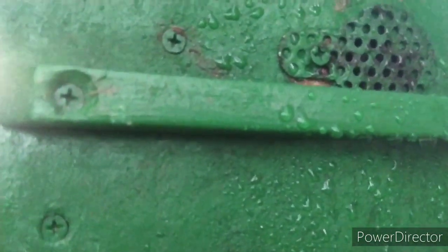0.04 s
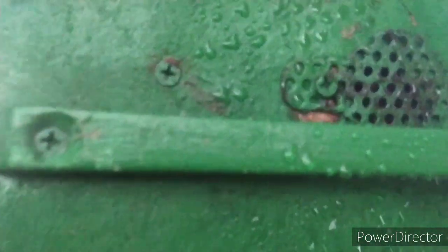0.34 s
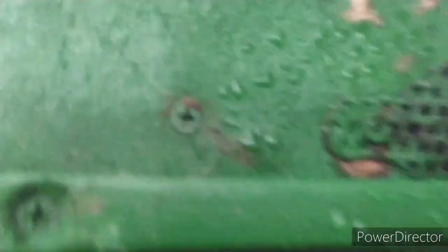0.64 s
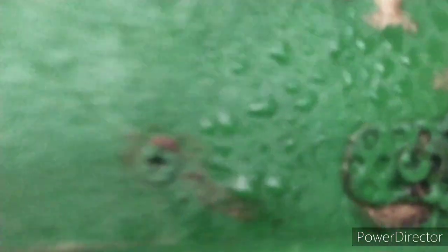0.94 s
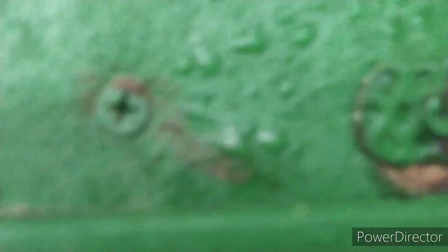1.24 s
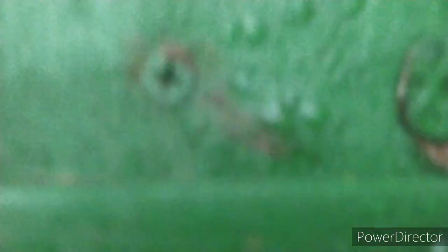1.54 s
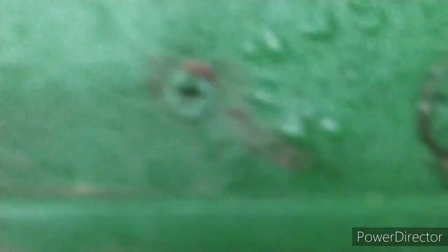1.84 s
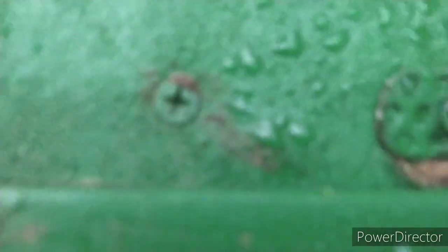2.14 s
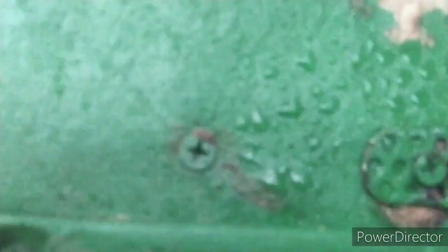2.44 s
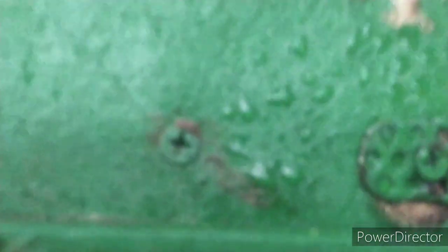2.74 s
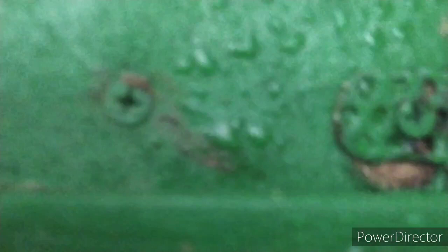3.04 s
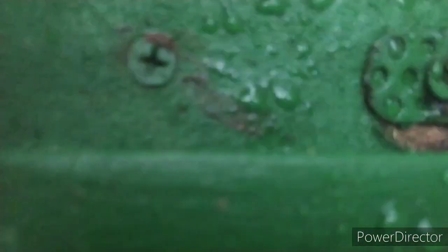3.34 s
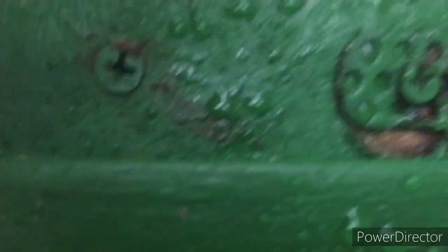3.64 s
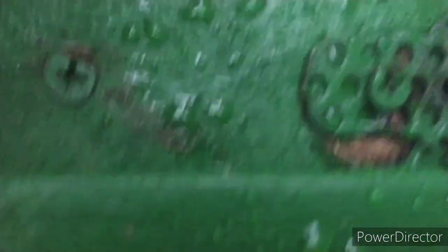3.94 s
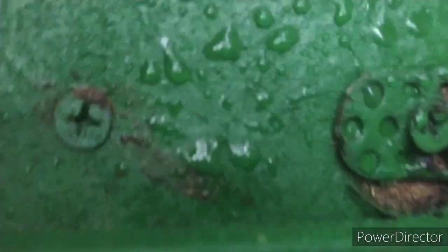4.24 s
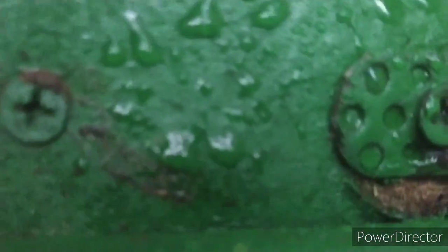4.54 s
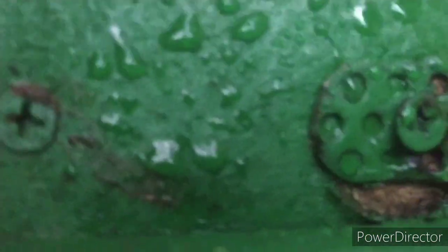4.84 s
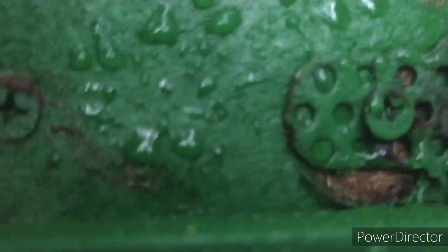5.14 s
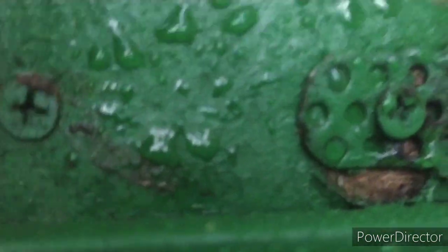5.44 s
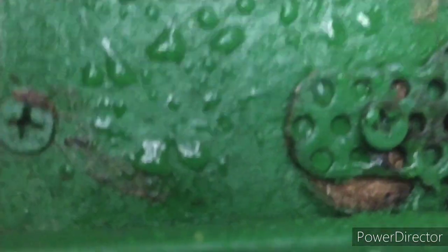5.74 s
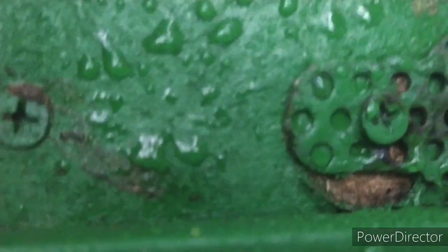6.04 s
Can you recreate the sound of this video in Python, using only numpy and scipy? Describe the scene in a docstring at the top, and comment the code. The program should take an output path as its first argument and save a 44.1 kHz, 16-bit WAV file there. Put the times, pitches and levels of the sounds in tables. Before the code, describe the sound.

In a quiet outdoor spot, a handheld microphone picks up close finger clicks, rubbing and a lumpy low rumble. As the clicks thin out, a bird sings a faint run of whistled notes and quick chirps. Two loud, short, hollow thumps on a wooden box just in front follow, about a second and a half apart, each with a harsh crackle.

```python
"""Fingers shift on a small camera held close to a painted wooden box outdoors. First they tap and brush
its two microphone ports, pushing air in and hissing, and a bird whistles far off. Something metal rings
faintly around 2 s, as a nearby songbird starts one phrase of gliding notes. Near the end of the song,
at 4 s, a bump rings the hollow box with a thump; a second follows at 5.5 s. Throughout, the hand makes
the camera's shell rumble over quiet outdoor air."""
import sys
import numpy as np
from scipy import signal
from scipy.fft import rfft, irfft, next_fast_len
from scipy.io import wavfile
from scipy.ndimage import uniform_filter1d, map_coordinates

SR = 44100
rng = np.random.default_rng(int(sys.argv[2]) if len(sys.argv) > 2 else 0)


def unload_audio(sound):
    """Save the sound as a 16-bit wav file, at the path given as the first command line argument."""
    columns = np.transpose(np.atleast_2d(sound))
    # keep every value between -1 and 1, then stretch to whole-number steps
    steps = np.round(np.clip(columns, -1, 1) * 32767)
    wavfile.write(sys.argv[1], SR, steps.astype(np.int16))


N = 273420


def amp(db):
    """Decibels to gain."""
    return 10 ** (np.asarray(db) / 20)


def unit(x):
    """Scale to rms 1."""
    return x / np.sqrt(np.mean(x ** 2) + 1e-20)


def along(points, hz):
    """Read (Hz, value) points on a log axis."""
    freqs, values = np.transpose(points)
    return np.interp(np.log(hz + 1), np.log(freqs), values)


def clock(length):
    """Sample times over a length in seconds."""
    return np.arange(int(length * SR)) / SR


def filtered(x, response):
    """Pass x through a frequency response."""
    n = x.shape[-1]
    padded = next_fast_len(n + 8192)
    return irfft(rfft(x, padded) * response(np.fft.rfftfreq(padded, 1 / SR)), padded)[..., :n]


def noise(size, colour):
    """Noise of rms 1, coloured by an EQ curve in dB."""
    return unit(filtered(rng.standard_normal(size), lambda hz: amp(colour(hz))))


def wide_noise(size, colour):
    """Independent coloured noise left and right."""
    return np.array([noise(size, colour), noise(size, colour)])


def high_cut(hz, edge_hz, steepness):
    """A treble roll-off in dB."""
    return -10 * np.log10(1 + (hz / edge_hz) ** steepness)


def band(hz, centre_hz, half_width_hz):
    """A band-pass curve in dB."""
    return -20 * np.log10(1 + ((hz - centre_hz) / half_width_hz) ** 2)


def wobble(t, rate):
    """A smooth random curve with rate knots a second."""
    return map_coordinates(rng.standard_normal(int(t[-1] * rate) + 4), [t * rate])


def pan(left_db):
    """Port gains for a left-minus-right level; the nearer port stays at full level."""
    return amp([[min(left_db, 0)], [min(-left_db, 0)]])


def add(out, start, x):
    """Mix x into out from a start time in seconds."""
    part = out[..., max(round(start * SR), 0):][..., :x.shape[-1]]
    part += x[..., :part.shape[-1]]


def leak(hz, corner_hz):
    """Slow pressure escapes round the diaphragm: a second-order high-pass."""
    return -hz ** 2 / (corner_hz ** 2 - hz ** 2 + 1j * hz * corner_hz)


# resonances of a covered port: (frequency [Hz], width [Hz], gain [dB])
PORT_MODES = [(396, 480, 1), (1140, 60, -5), (1780, 270, 2), (3250, 190, 2)]
def cavity(hz):
    """The hollow between fingertip and diaphragm rings briefly at its resonances."""
    return 1 + sum(amp(db) * 1j * hz * width / (centre ** 2 - hz ** 2 + 1j * hz * width)
                   for centre, width, db in PORT_MODES)


# dark tone of skin pressed on a port: (frequency [Hz], level [dB])
PRESSED_SKIN_EQ = [(40, -24), (150, -4.5), (450, 2.5), (1000, -8), (2500, -13), (7000, -23.5), (16000, -31)]
# fingertip hits: (time [s], level [dB], contact time [ms], thud against push [dB], port [left/right])
TAPS = [(0.2113, -4, 0.21, -25, "left"), (0.236, -23.5, 0.64, -14, "left"),
        (0.719, -27.5, 0.18, 16, "left"), (.745, -0.5, 0.24, -10, "left"), (0.7593, -9, 0.21, 7, "left"),
        (0.8835, -6.5, 0.31, -40, "left"), (0.9485, -25.5, 0.78, -11, "left"),
        (1.0232, -6.5, 1.03, -33, "left"), (1.038, -11, 1, -28, "left"), (1.111, -25.5, 0.22, 18.5, "left"),
        (1.4321, -5.5, 0.12, 4, "left"), (1.728, -18, 3.5, 6, "left"), (1.7397, -18.5, 0.12, 4, "left"),
        (2.398, -10.5, 0.24, -8, "right"), (3.553, -4, 8.6, -17, "left"), (5.079, -17, 30, 13.5, "left"),
        (5.3448, -9.5, 3.1, -10, "left")]
def taps(thud_hz=112, thud_t60=0.016, leak_hz=100, skin_db=-27, dulling_hz=450):
    """A fingertip pushes air into a port; the skin crackles and the shell gives a low thud."""
    out, t = np.zeros((2, N)), clock(.12)
    for start, db, contact_ms, thud_db, port in TAPS:
        side = 1 if port == "left" else -1
        contact = t / (contact_ms / 1000) * np.pi
        attack = 1 - np.exp(-contact)
        push = contact ** 3 * np.exp(-contact)
        thud = np.sin(2 * np.pi * thud_hz * t) * attack * amp(thud_db - 60 * t / thud_t60)
        # a slow contact is dull
        skin = noise(len(t), lambda hz: along(PRESSED_SKIN_EQ, hz) - hz * contact_ms / dulling_hz)
        skin *= attack ** 2 * amp(skin_db - 60 * t / .015)
        # the push stays at its own port; the thud crosses the shell more easily
        tap = pan(side * 40) * (push / push.max() + skin) + pan(side * 34) * thud
        add(out, start, amp(db) * filtered(tap, lambda hz: leak(hz, leak_hz) * cavity(hz)))
    return out


# airy tone of grazing skin: (frequency [Hz], level [dB])
AIRY_EQ = [(100, 16.5), (400, -4), (800, -7), (4000, -4.5), (14000, -4)]
# the tone opens as the finger creeps up to the port: (time [s], high cut [Hz], air pocket boost [dB])
RUB_TONE = [(.3, 6450, 4.5), (.76, 9400, 2), (1.8, 19100, 0.5)]
# brush strokes: (time [s], attack [s], release [s], level [dB], pressure [0-1], pan left [dB])
RUBS = [(.126, 0.0022, 0.062, -26.5, 0.13, 34), (0.27, .008, 0.0097, -39, 1, 29),
        (.302, 0.022, 0.063, -42, 0.34, 19), (0.401, 0.12, 0.4, -52.5, 0.8, 24),
        (0.7574, 0.00079, 0.013, -17, 0.68, 37), (.77, 0.05, 0.037, -26, 0.58, 43),
        (0.903, 0.012, 0.033, -35.5, 0.5, 30), (1.017, 0.0057, 0.063, -23.5, 0.65, 39),
        (1.4311, 0.0012, 0.0031, -20, 0.25, 33), (1.431, 0.0026, 0.034, -35, 0.35, 18),
        (1.514, 0.03, 0.084, -42.5, 0.15, 7), (1.595, 0.013, 0.031, -38, 0.58, -21),
        (1.673, 0.015, 0.037, -29.5, 0.5, -15), (1.722, 0.0091, 0.058, -34.5, 0.07, 23),
        (1.845, 0.035, 0.11, -38.5, 0, 10), (1.948, 0.02, 0.042, -35.5, 0.11, 9),
        (2.395, 0.0029, 0.051, -24.5, 0.65, -28), (2.43, 0.052, 0.081, -46, 0.01, 4.5),
        (3.933, 0.011, 0.0051, -43.5, 0.24, 5)]
def rubs(catch_db=1.5, pocket_hz=3500, pocket_width_hz=2400, ridge_db=-0.5, pressed_ridge_db=2):
    """Skin hisses over a port in short strokes, fuller and darker the harder it presses."""
    out = np.zeros((2, N))
    times, edges, boosts = np.transpose(RUB_TONE)
    for start, rise, fall, db, pressure, pan_db in RUBS:
        t = clock(rise + fall)
        edge_hz = np.interp(start + rise, times, edges)
        boost_db = np.interp(start + rise, times, boosts)

        def colour(hz):
            """Skin tone plus the resonance of air trapped under the finger."""
            skin = (1 - pressure) * along(AIRY_EQ, hz) + pressure * along(PRESSED_SKIN_EQ, hz)
            pocket = boost_db / (1 + (2 * (hz - pocket_hz) / pocket_width_hz) ** 2)
            return skin + pocket + high_cut(hz, edge_hz, 5)

        swell = np.sin(np.pi / 2 * np.interp(t, [0, rise, rise + fall], [0, 1, 0]))
        # the ridges of the skin catch and slip, more roughly under pressure
        ridges = unit(amp((ridge_db + pressed_ridge_db * pressure) * wobble(t, 898)))
        stroke = amp(db + catch_db * wobble(t, 211)) * swell * ridges
        add(out, start, pan(pan_db) * stroke * wide_noise(len(t), colour))
    return out


# rumble of the gripped shell: (frequency [Hz], level [dB])
SHELL_EQ = [(20, -27), (40, -3.5), (65, 6), (110, -3.5), (180, -12.5), (300, -44), (2000, -64)]
# how hard the hand works on the shell: (time [s], level before trim [dB])
GRIP_FADER = [(0.74, -48), (0.93, -41.5), (1.24, -59.5), (1.83, -45.5), (2.68, -40.5), (3.11, -44),
              (3.49, -43.5), (3.8, -52), (3.94, -52), (4.14, -32.5), (4.52, -53.5), (4.8, -54.5),
              (4.97, -40.5), (6.2, -42.5)]
# the hand slips to a new hold: (time [s], length [s], level [dB])
SLIPS = [(0.132, 0.0071, -30.5), (0.223, 0.081, -32), (0.762, 0.014, -19.5), (1.893, 0.026, -25),
         (2.197, 0.031, -27.5), (2.711, 0.076, -25.5), (2.943, 0.038, -28.5), (3.389, 0.21, -32),
         (4.27, 0.15, -25), (4.75, 0.24, -34.5), (5.059, 0.063, -24.5), (5.352, 0.021, -20),
         (5.682, 0.075, -25.5), (5.96, 0.26, -30)]
def grip(trim_db=6, lump_db=4.6, lumps_per_s=22, creak_db=-19, creak_hz=180,
         attack_s=0.015, release_s=0.021):
    """The hand, on the left, rumbles the shell in uneven lumps; each slip swells, holds and dies away."""
    t, channels = np.arange(N) / SR, []
    power = (pan(15) * amp(np.interp(t, *np.transpose(GRIP_FADER)) + trim_db)) ** 2
    for start, length, db in SLIPS:
        swell = np.interp(t - start, [-attack_s, 0, length, length + release_s], [0, 1, 1, 0])
        power += (pan(24) * amp(db) * swell ** 2) ** 2
    for envelope in np.sqrt(power):
        rumble = noise(N, lambda hz: along(SHELL_EQ, hz))
        rumble /= np.sqrt(np.abs(uniform_filter1d(rumble ** 2, size=3000)) + 0.033)  # even out the level
        # the skin catches now and then with a dull creak above the rumble
        creak = noise(N, lambda hz: band(hz, creak_hz, creak_hz / 2)) * unit(amp(5 * wobble(t, 49)))
        lumps = unit(amp(lump_db * wobble(t, lumps_per_s)))
        channels.append(envelope * (rumble * lumps + amp(creak_db) * creak))
    return np.array(channels)


# hollow body of the box: (frequency [Hz], level [dB], t60 [s])
BOX_MODES = [(154.2, -2, 0.091), (195.8, -23.5, 0.23), (262, -30.5, 0.15), (333, -14.5, 0.08),
             (404.5, -11.5, 0.056), (498, -36.5, 0.12), (731, -22.5, 0.055), (786, -29, 0.061)]
# harsh crackle of the overloaded recorder: (frequency [Hz], level [dB])
OVERLOAD_EQ = [(300, 19.5), (800, 5), (2000, -6), (4000, -14), (7000, -24), (14000, -18)]
# hits on the box: (time [s], level [dB], crackle within the hit [dB], board within the hit [dB])
BUMPS = [(3.9593, 6.3, -18.5, -47), (5.4873, 6.297, -16.5, -22.5)]
def box_bumps(leak_hz=95, panels_db=-21, panels_t60=0.07, panels_hz=500,
              board_hz=1240, board_t60=0.028, crackle_t60=0.049):
    """Each bump rings the box and struck board, with a short, harsh crackle of recorder overload."""
    out, t = np.zeros((2, N)), clock(0.13)
    attack = 1 - np.exp(-t / .0013)
    for start, db, crackle_db, board_db in BUMPS:
        body = -sum(amp(mode_db + rng.normal(0, 1) - 60 * t / t60) * np.cos(2 * np.pi * hz * t)
                    for hz, mode_db, t60 in BOX_MODES)
        board = np.sin(2 * np.pi * board_hz * t) * amp(board_db - 60 * t / board_t60)
        panels = noise(len(t), lambda hz: high_cut(hz, panels_hz, 8))  # many close, damped modes
        panels *= amp(panels_db - 60 * t / panels_t60)
        crackle = wide_noise(len(t), lambda hz: along(OVERLOAD_EQ, hz))
        crackle *= amp(crackle_db - 60 * t / crackle_t60)
        thump = (body + board + panels + crackle) * attack
        add(out, start, amp(db) * filtered(thump, lambda hz: leak(hz, leak_hz)))
    return out


# skin catching on the shell: (time [s], level [dB], pan left [dB])
TICKS = [(0.7196, -26, 25), (0.735, -20, 30), (0.761, -11.5, 35), (0.9484, -24, 31), (1.786, -36.5, 12),
         (1.9469, -29.5, 8), (2.059, -39, -13), (2.246, -48, -8), (2.352, -42.5, -11), (2.387, -32.5, -18),
         (2.757, -49, 4), (2.916, -51.5, 1), (4.447, -48, -6)]
def ticks(t60=0.01, dulling_hz=1600):
    """Tiny dry ticks as the fingers resettle on either side of the shell."""
    out, t = np.zeros((2, N)), clock(.02)
    for start, db, pan_db in TICKS:
        tick = noise(len(t), lambda hz: along(PRESSED_SKIN_EQ, hz) - hz / dulling_hz)
        tick *= amp(db - 60 * t / t60)
        add(out, start, pan(pan_db) * filtered(tick, cavity))
    return out


# four bird syllables, a row per note:
# (delay [s], length [s], start pitch [Hz], middle pitch [Hz], end pitch [Hz], level [dB], buzz depth [Hz])
PAIR = [(0, 0.025, 7500, 6250, 5800, -3, 0), (.048, 0.0325, 4680, 5186, 5020, -0.5, 0)]
SLUR = [(0, .125, 4810, 4030, 4030, 3.5, 231), (.197, 0.023, 5200, 6100, 7400, -6, 0),
        (.24, .15, 6840, 4700, 4180, 3, 279)]
TRILL = [(0, 0.051, 2080, 3006, 4470, -10, 210), (.042, 0.016, 4440, 4560, 4670, -9.5, 200),
         (.066, .02, 5350, 4500, 3950, -5.5, 450), (.084, 0.028, 3846, 3070, 2014, -4.5, 140)]
FLOURISH = [(0, 0.025, 5370, 6030, 6200, -3, 80.4), (.022, 0.054, 6500, 5400, 4430, -7.5, 453),
            (.077, 0.0196, 5430, 6130, 6300, -3, 104), (.1, 0.0206, 5200, 4900, 4680, -2.5, 400),
            (.167, 0.024, 3540, 2910, 2300, -1.5, 500), (.211, 0.03, 1750, 2350, 3500, -2.5, 50),
            (.236, 0.0101, 3300, 3750, 4100, 3, 80), (.49, 0.026, 3470, 3980, 2210, -4.5, 846)]
# the phrase: (syllable, its cues as (time [s], level before the mix [dB]))
SONG = [(PAIR, [(2.155, -51), (2.298, -48), (2.44, -45), (2.582, -44)]), (SLUR, [(2.72, -46)]),
        (TRILL, [(3.19, -36.5), (3.355, -37), (3.52, -35), (3.682, -35), (3.848, -36)]),
        (FLOURISH, [(4.025, -43.5)])]
def songbird(buzz_hz=140, rough_db=2.2):
    """One phrase of gliding whistles: paired notes, a slur, a trill and a buzzy flourish."""
    out = np.zeros(N)
    for syllable, cues in SONG:
        for start, db in cues:
            for delay, length, start_hz, middle_hz, end_hz, note_db, depth_hz in syllable:
                t = clock(length)
                progress = t / length
                glide = np.polyval(np.polyfit([0, .5, 1], [start_hz, middle_hz, end_hz], 2), progress)
                buzz = np.sin(2 * np.pi * buzz_hz * t + wobble(t, 60)) + .5 * wobble(t, 500)
                pitch = glide * rng.normal(1, .008) + depth_hz * buzz
                swell = np.sqrt(np.sin(np.pi * progress)) * amp(db + note_db + rough_db * wobble(t, 137))
                add(out, start + delay, swell * np.sin(2 * np.pi * np.cumsum(pitch) / SR))
    return out


def songbird_roll(start_s=4.272, length_s=.146, first_hz=3250, last_hz=2000, flicks_hz=62, sweep=.55,
                  fade_db=9):
    """A rolled note: rapid, wide downward flicks that sink in pitch and fade."""
    out, t = np.zeros(N), clock(length_s)
    progress, flick = t / length_s, t * flicks_hz % 1
    pitch = first_hz * (last_hz / first_hz) ** progress * (1 + sweep * (.5 - flick))
    swell = np.sin(np.pi * flick) * amp(-40 - fade_db * progress)
    add(out, start_s, swell * np.sin(2 * np.pi * np.cumsum(pitch) / SR))
    return out


# touches on something metal: (time [s], level [dB])
PINGS = [(1.739, -33.5), (1.973, -44.5), (2.186, -47.5)]
def metal_pings(ring_hz=457, t60=0.19):
    """A light touch leaves one faint tone ringing."""
    out, t = np.zeros((2, N)), clock(.5)
    for start, db in PINGS:
        add(out, start, np.sin(2 * np.pi * ring_hz * t) * amp(db - 60 * t / t60))
    return out


# distant bird calls: (start [s], end [s], pitch [Hz], level [dB])
FAR_CALLS = [(0.348, 0.757, 2090, -55.5), (2.483, 2.83, 1680, -62.5)]
def far_bird(half_width_hz=200, pan_db=14):
    """Long whistles, blurred by distance into narrow bands."""
    out = np.zeros((2, N))
    for start, end, call_hz, db in FAR_CALLS:
        size = int((end - start) * SR)
        call = wide_noise(size, lambda hz: band(hz, call_hz, half_width_hz))
        add(out, start, pan(pan_db) * amp(db) * call * signal.windows.tukey(size, .4))
    return out


# reverb tail of the trees: (frequency [Hz], t60 [s])
TREE_DECAY = [(2000, 0.23), (6000, 0.49), (12000, 0.11)]
def tree_echo(x, early_t60=.07):
    """Quick reflections from nearby surfaces, then scattered echoes from trunks and leaves."""
    hz, t, scatter = signal.stft(rng.standard_normal((2, SR // 2)), SR, nperseg=256)
    early = 1.3 * amp(-60 * t / early_t60)
    late = amp(-60 * t / along(TREE_DECAY, hz)[:, None])
    impulse = signal.istft(scatter * (early + late), SR, nperseg=256)[1]
    return signal.fftconvolve(x[None], impulse / np.linalg.norm(impulse[0]), axes=1)[:, :N]


# fader ride of the faint hiss: (time [s], level [dB])
HISS_FADER = [(0.701, -46), (1.1, -50), (1.65, -55), (1.8, -48.5), (2.01, -47), (2.25, -60), (3.88, -59),
              (4.05, -71), (5.6, -62.5)]
def faint_hiss(pan_db=7, edge_hz=15000, grain_db=4):
    """Grainy hiss: skin at first, later the recorder's noise floor, ducking after the first thump."""
    t = np.arange(N) / SR
    times, hiss_db = np.transpose(HISS_FADER)
    grain = unit(amp(grain_db * wobble(t, 700) + 1.5 * wobble(t, 45) + 1.5 * wobble(t, 8)))
    envelope = amp(np.interp(t, times, hiss_db)) * (t > times[0])
    hiss = wide_noise(N, lambda hz: along(AIRY_EQ, hz) + high_cut(hz, edge_hz, 5))
    return pan(pan_db) * envelope * grain * hiss


# outdoor ambience: (frequency [Hz], level [dB])
OUTDOOR_EQ = [(20, 2.5), (150, -9), (400, -10.5), (700, -16), (2500, -25), (6000, -24), (15000, -32)]
def air(level_db=-56, pan_db=2):
    """A quiet outdoor bed with a little hiss."""
    return pan(pan_db) * amp(level_db) * wide_noise(N, lambda hz: along(OUTDOOR_EQ, hz))


def scene():
    """Handling noise at the ports, the box just ahead, birds off to the left."""
    song = songbird() + songbird_roll()
    song_in_trees = amp(-6) * song + amp(-.5) * tree_echo(song)
    birds = pan(6.6) * song_in_trees + far_bird()
    camera = taps() + rubs() + faint_hiss() + ticks() + grip()
    return camera + box_bumps() + metal_pings() + birds + air()


def record(dry, low_cut_hz=34, top_hz=15700):
    """The camera sheds the deepest bass, soft-clips the peaks and keeps nothing above its band limit."""
    thinned = filtered(dry, lambda hz: leak(hz, low_cut_hz))
    rounded = thinned / (1 + np.abs(thinned) ** 5) ** (1 / 5)
    return filtered(rounded, lambda hz: 1 / np.sqrt(1 + (hz / top_hz) ** 160))


dry = scene()
out = record(dry)
unload_audio(out)
```